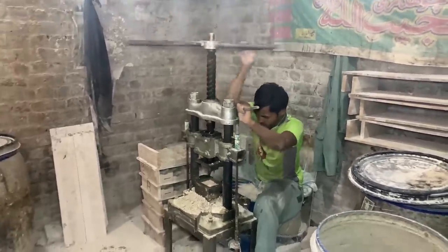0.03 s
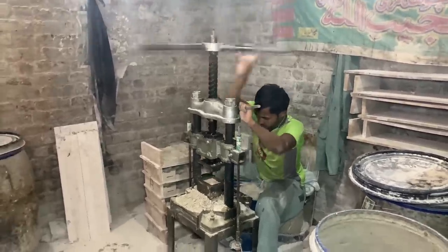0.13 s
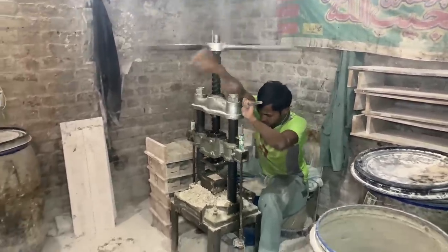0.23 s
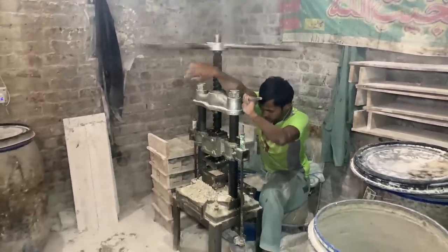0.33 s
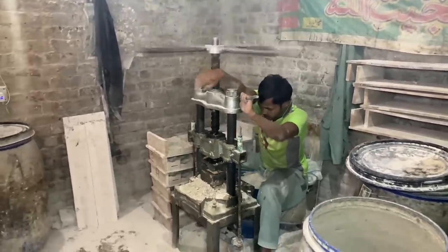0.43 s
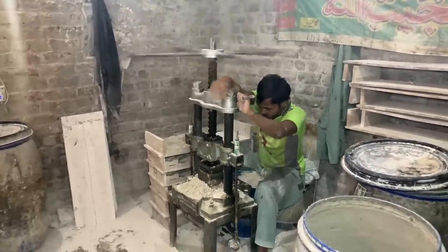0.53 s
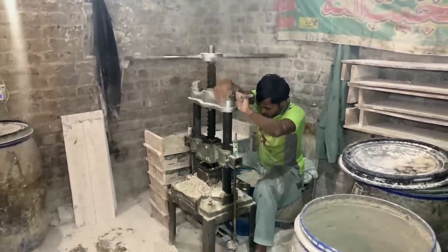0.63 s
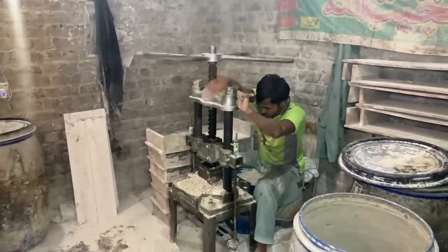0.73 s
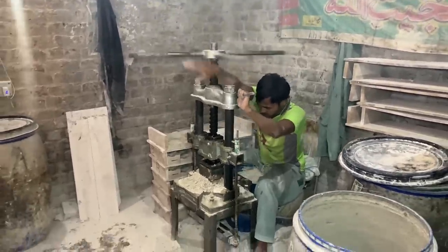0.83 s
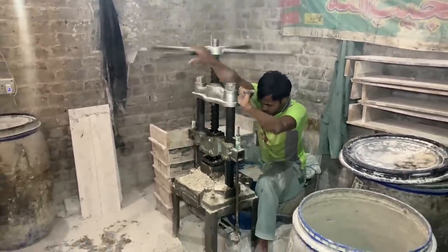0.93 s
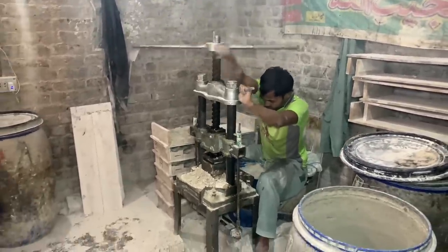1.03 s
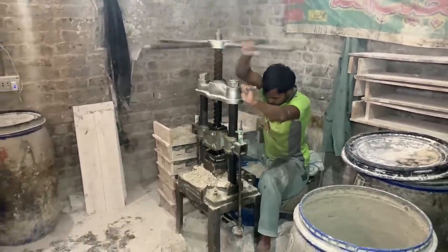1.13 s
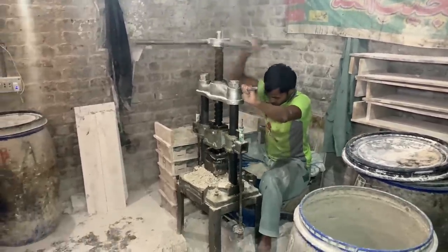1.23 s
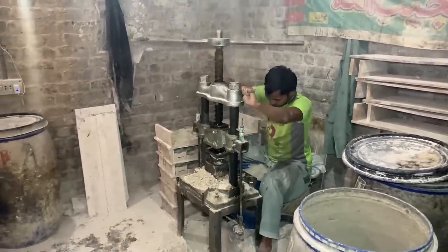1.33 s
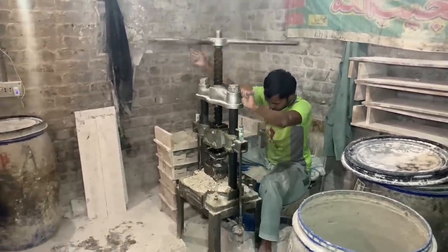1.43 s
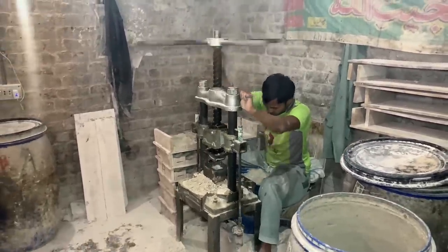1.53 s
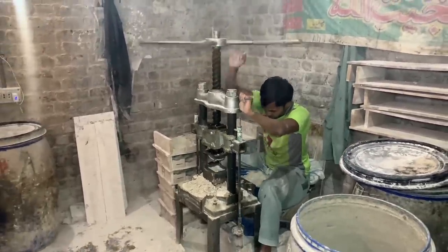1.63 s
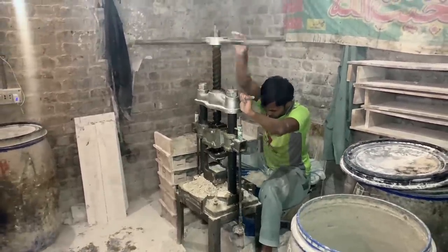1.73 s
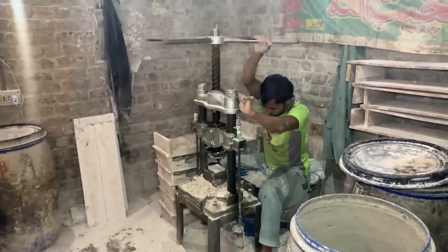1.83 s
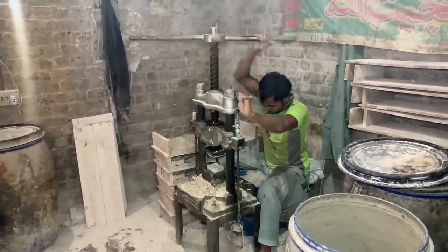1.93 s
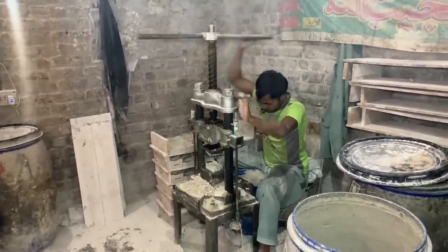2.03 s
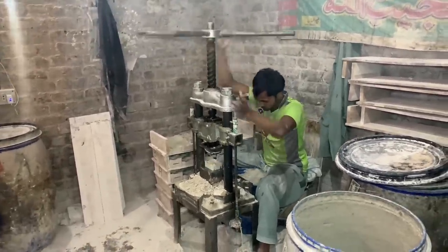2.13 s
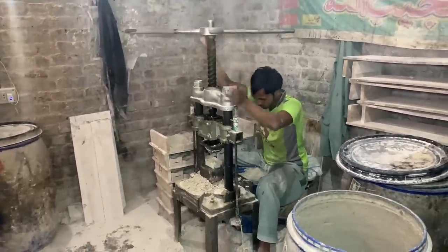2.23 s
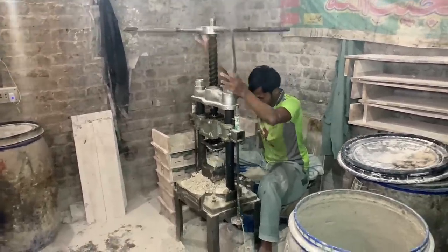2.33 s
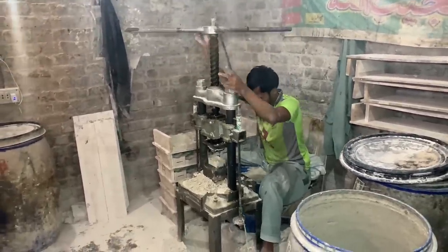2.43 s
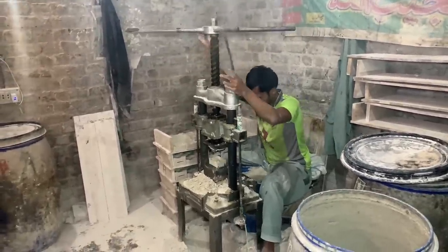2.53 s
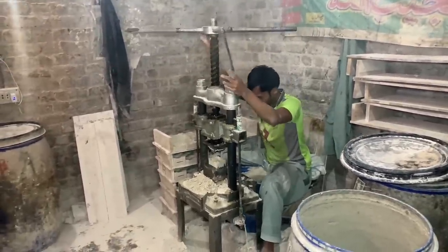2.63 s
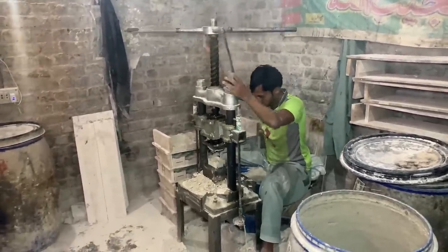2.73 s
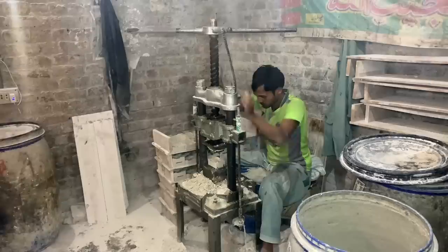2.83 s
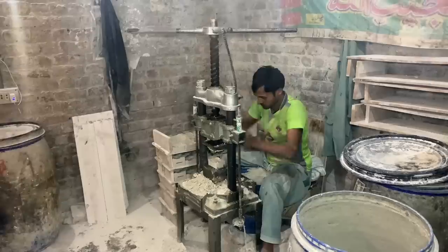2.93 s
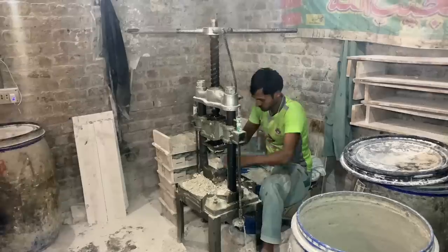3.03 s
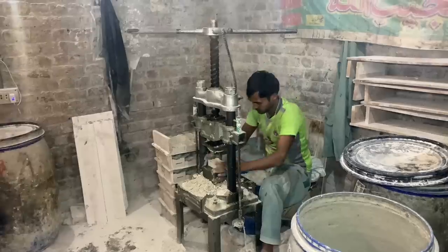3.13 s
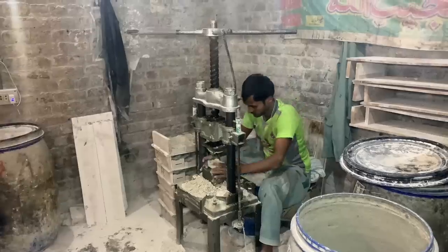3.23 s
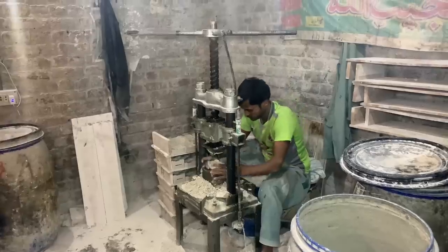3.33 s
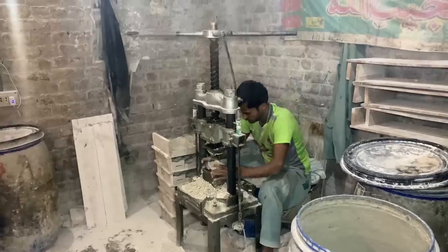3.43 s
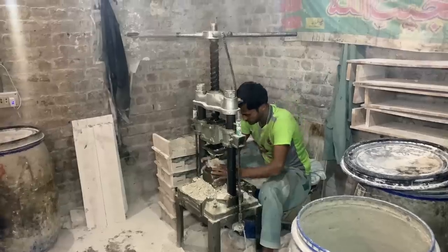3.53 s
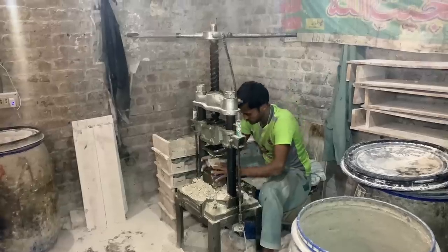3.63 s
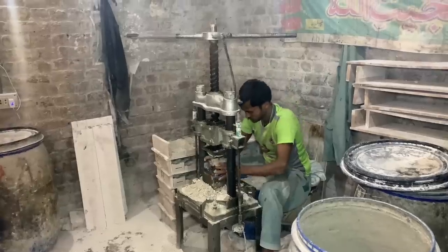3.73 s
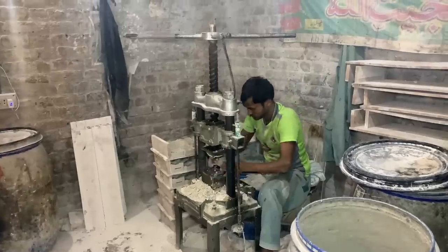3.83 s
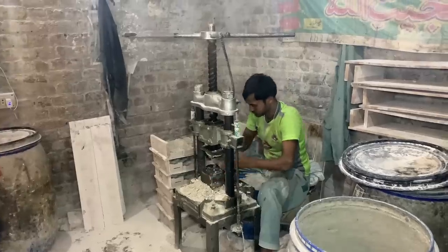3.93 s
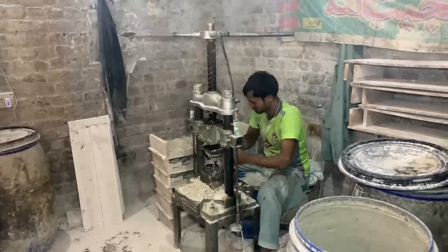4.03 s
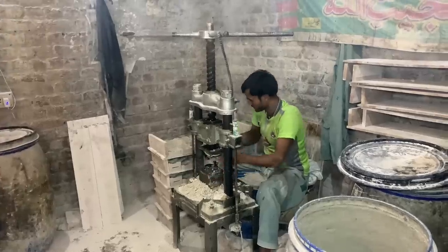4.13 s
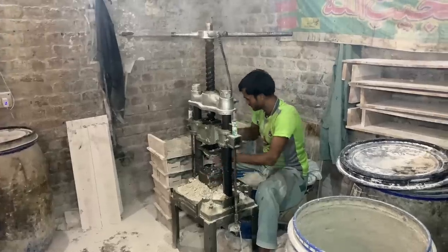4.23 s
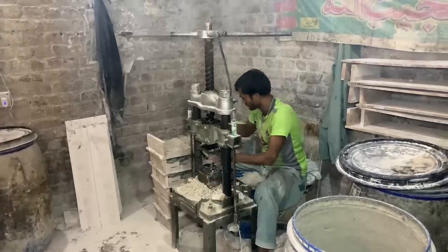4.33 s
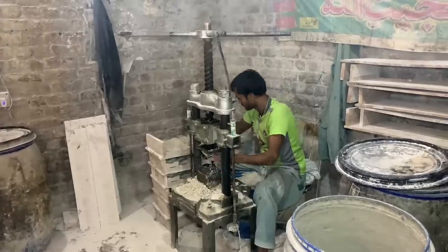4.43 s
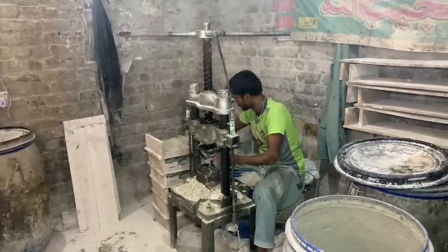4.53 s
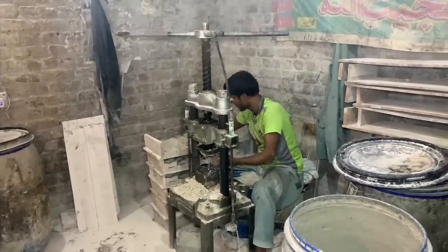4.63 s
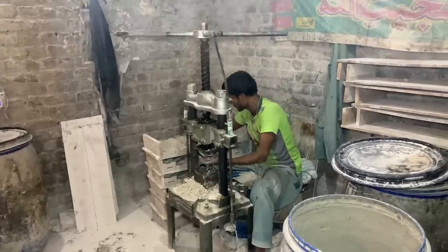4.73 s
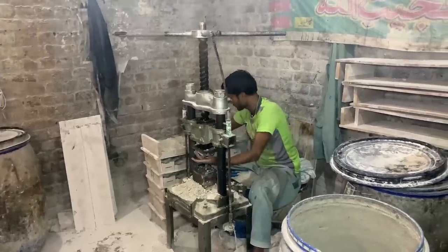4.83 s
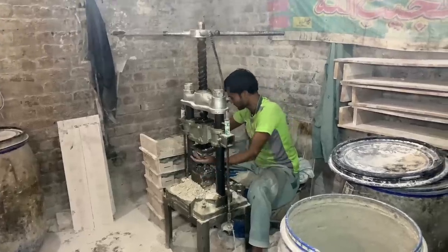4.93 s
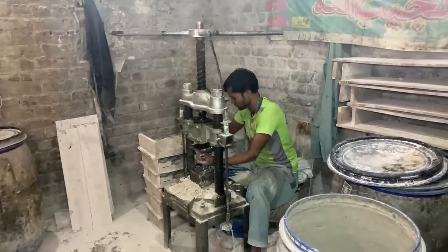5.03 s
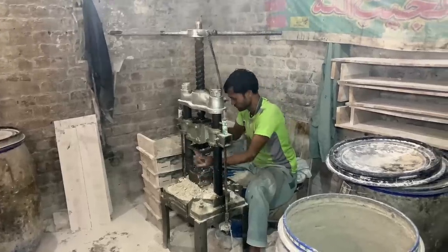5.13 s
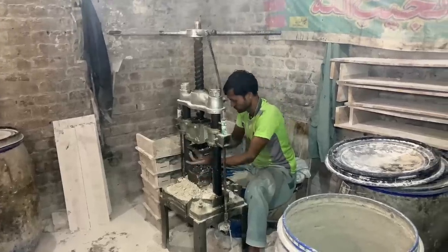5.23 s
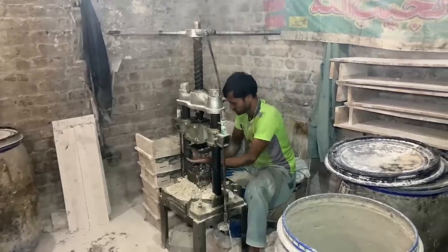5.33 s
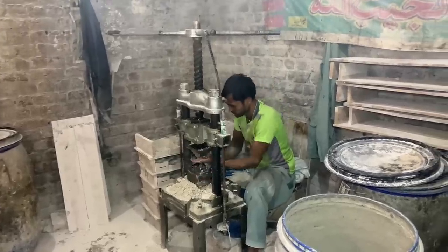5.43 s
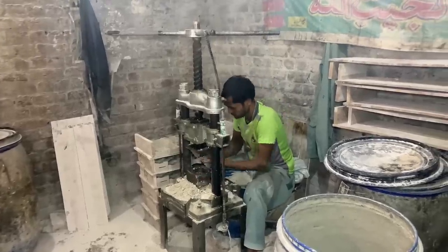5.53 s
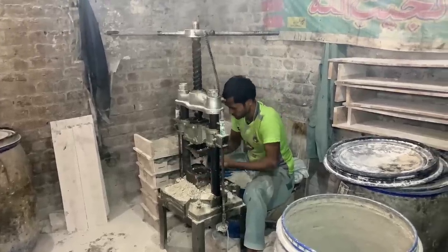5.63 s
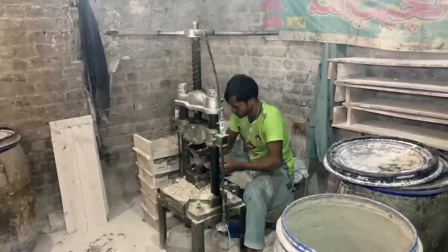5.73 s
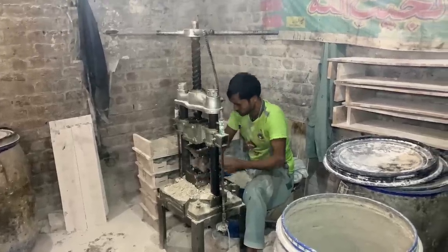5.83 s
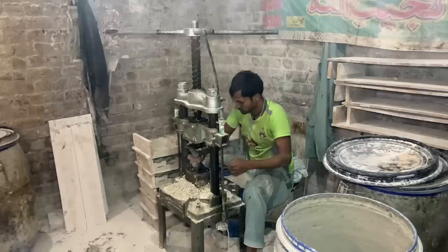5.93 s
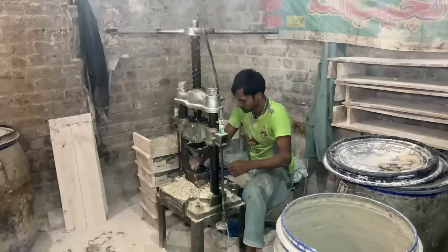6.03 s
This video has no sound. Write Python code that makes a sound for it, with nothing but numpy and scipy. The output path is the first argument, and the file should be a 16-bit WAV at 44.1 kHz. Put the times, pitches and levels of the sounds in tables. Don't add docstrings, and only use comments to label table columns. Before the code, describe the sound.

A hand screw press slams down with a heavy choked metal thud, then steel parts clink and rattle, a second softer blow, and a sharp closing clatter.

```python
import sys
import numpy as np
from scipy import signal
from scipy.fft import rfft, irfft, next_fast_len
from scipy.io import wavfile
from scipy.ndimage import uniform_filter1d, map_coordinates

SR = 44100
rng = np.random.default_rng(int(sys.argv[2]) if len(sys.argv) > 2 else 0)


def volts_from_db(level):
    exponent = np.asarray(level, float) / 20
    return 10 ** exponent


def wav_record(signal):
    frames = np.transpose(np.atleast_2d(signal))
    bounded = np.clip(frames, -1, 1)
    quanta = np.round(bounded * 32767).astype(np.int16)
    wavfile.write(sys.argv[1], SR, quanta)


N = 268877


def unit(x):
    return x / np.sqrt(np.mean(x ** 2) + 1e-20)


def along(points, hz):
    f, v = np.transpose(points)
    return np.interp(np.log(hz + 1), np.log(f + 1), v)


def wobble(rate_hz):
    knots = rng.standard_normal(int(N * rate_hz / SR) + 4)
    return map_coordinates(knots, [np.arange(N) * rate_hz / SR])


def surge(s, hold_s, db, rise_db_s, fall_db_s):
    t = np.arange(N) / SR - s
    return db + np.minimum(0, np.minimum(rise_db_s * t, fall_db_s * (hold_s - t)))


def filtered(x, response):
    m = next_fast_len(x.shape[-1] + SR // 4)
    spectrum = rfft(x, m) * response(np.fft.rfftfreq(m, 1 / SR))
    return irfft(spectrum, m)[..., :x.shape[-1]]


def coloured(x, spectrum):
    return unit(filtered(x, lambda hz: volts_from_db(along(spectrum, hz))))


def resonant(x, peaks):
    def response(f):
        total = 0
        for k, (centre, width, db) in enumerate(peaks):
            damping = 1j * f * width
            total = total + (-1) ** k * volts_from_db(db) * damping / (centre * centre - f * f + damping)
        return total
    return unit(filtered(x, response))


def chatter(length, rate_hz, spread_db):
    hits = rng.random(length) < rate_hz / SR
    size = rng.standard_normal(length) * volts_from_db(spread_db * rng.standard_normal(length))
    return unit(hits * size)


def add(bus, s, sound):
    part = bus[..., round(abs(s) * SR):][..., :sound.shape[-1]]
    part += sound[..., :part.shape[-1]]


def diffuse(pair):
    # frequency in Hz, left-right likeness [0..1]
    likeness = [(60, 1), (300, 0.91), (550, 0.27), (900, 0.15), (1400, 0.043), (2400, 0.038), (4000, 0.2),
                (6500, 0.12), (9500, 0.036), (13000, 0.19)]

    def blend(hz):
        angle = np.arccos(np.clip(along(likeness, hz), -1, 1)) / 2
        return np.array([np.cos(angle), np.sin(angle)])
    mid, side = filtered(pair, blend)
    return np.array([mid + side, mid - side])


def room(x, wet_db):
    # frequency in Hz, t60 in seconds
    brick_t60 = [(60, 0.76), (300, 1), (1500, 0.34), (5000, 0.4), (12000, 0.19)]
    hz, t, z = signal.stft(rng.standard_normal((2, SR * 3 // 4)), SR, nperseg=256)
    tail = signal.istft(z * volts_from_db(-60 * t / along(brick_t60, hz)[:, None]), SR, nperseg=256)[1]
    tail = np.pad(diffuse(tail), ((0, 0), (150, 0)))
    wet = signal.fftconvolve(x[None], tail / np.linalg.norm(tail[0]), axes=1)[:, :len(x)]
    return x + volts_from_db(wet_db) * wet


def murk(spectrum, patchy_db):
    z = signal.stft(rng.standard_normal((2, N)), nperseg=1024)[2]
    field = uniform_filter1d(rng.standard_normal(z.shape[1:]), 8, 0)
    field = unit(uniform_filter1d(field, 6, 1))
    noise = signal.istft(z * volts_from_db(patchy_db * field), nperseg=1024)[1][:, :N]
    return diffuse(coloured(noise, spectrum))


def motor():
    # start in seconds, hold in seconds, level in dB, rise in dB/s, fall in dB/s
    pass_by = (2.55, .27, -35, 150, 90)
    cycles = 114 * np.cumsum(1 + 0.0066 * wobble(10.4)) / SR
    return volts_from_db(surge(*pass_by) + 3.0 * wobble(14)) * np.sin(2 * np.pi * cycles)


def shop():
    # frequency in Hz, density in dB per Hz
    rumble_spectrum = [(13, -83), (31, -43.5), (46, 1.5), (59, 10), (86, 7), (124, 7.5), (200, 4),
                       (260, -27.5), (440, -120)]
    body_spectrum = [(71, -22), (120, -6), (194, -19), (229, 2.5), (258, -7.5), (283, -6), (376, -9),
                     (423, -14), (499, -9.5), (554, -15), (780, -20), (931, -21), (2000, -27.5),
                     (2600, -37.5), (4400, -120)]
    hiss_spectrum = [(710, 3.5), (1200, 1), (1450, -19), (1840, -27), (2000, -14), (2840, -14),
                     (3020, -16.5), (3250, -18.5), (4530, -25.5), (5580, -32.5), (6800, -35), (7500, -46.5),
                     (8100, -39), (9000, -39.5), (11900, -57), (14400, -56)]
    # time in seconds, level in dB
    activity = [(0, 3), (.25, -1), (.5, -1), (1.2, 0), (1.55, 4), (1.9, -2.5), (2.3, 0), (2.7, 2.5),
                (3.1, -1.5), (3.5, 1.5), (3.85, -2), (4.7, -3), (5.1, 0.5), (5.3, -1), (5.55, 2.5),
                (5.8, -2.5), (6.1, 7)]
    # start in seconds, hold in seconds, level in dB
    shudders = [
        (0.756, 0.035, -27),
        (4.135, 0.09, -20.5),
    ]
    s, db = np.transpose(activity)
    bustle_db = np.interp(np.arange(N) / SR, s, db)
    boom = sum(volts_from_db(surge(*row, rise_db_s=180, fall_db_s=72)) for row in shudders)
    swell = wobble(5)
    rumble = volts_from_db(-36.5 + 0.32 * bustle_db) + boom
    rumble = rumble * volts_from_db(1.1 * swell + 0.8 * wobble(8))
    body = volts_from_db(-33.5 + 0.57 * bustle_db) + volts_from_db(-10.5) * boom
    body = body * volts_from_db(1.1 * swell + 0.6 * wobble(12))
    hiss = volts_from_db(-40.5 + 0.78 * bustle_db) + volts_from_db(-11.5) * boom
    hiss = hiss * volts_from_db(0.6 * swell)
    out = rumble * murk(rumble_spectrum, patchy_db=2.0)
    out = out + body * murk(body_spectrum, patchy_db=1.5)
    return out + hiss * murk(hiss_spectrum, patchy_db=1.5)


def small_parts():
    # start in seconds, peak in dB, scrape length in seconds, brightness in dB per octave
    ticks = [(-0.011, -33, 0.009, -6), (0.164, -42, 0.11, -3.5), (0.224, -33.5, 0.047, -11.5),
             (0.643, -55, 0.0097, -1), (0.779, -27, 0.016, 5), (0.832, -27, 0.034, -16),
             (1.151, -54, 0.01, -14), (1.377, -59, 0.045, -19), (1.474, -39.5, 0.088, -17.5),
             (1.51, -42, 0.026, -6), (3.349, -42, 0.031, -6.5), (3.993, -29.5, 0.027, -6),
             (4.081, -21.5, 0.0073, 2), (4.093, -33, 0.038, -8), (4.358, -55.5, 0.04, 6),
             (4.972, -47, 0.12, 0), (5.123, -46.5, 0.12, -2), (5.435, -42.5, 0.037, -3.5),
             (5.479, -27.5, 0.0057, -7)]
    # start in seconds, length in seconds, pitch in Hz, level in dB
    cheeps = [
        (0.946, 0.074, 6080, -69),
        (1.07, 0.073, 6100, -87),
        (4.526, 0.048, 6380, -68),
        (4.69, 0.053, 5600, -67),
        (4.697, 0.03, 6240, -77),
        (5.139, 0.033, 2690, -50),
        (5.143, 0.04, 5430, -81),
        (5.152, 0.044, 4280, -74),
    ]
    out, t = np.zeros(N), np.arange(SR // 4) / SR
    for s, db, length_s, tilt_db in ticks:
        colour = [(600, -27.5), (1500, -2 * tilt_db), (6000, -5.0), (10500, -15.0 + tilt_db), (14500, -32.0)]
        grit = chatter(len(t), 4900, 7.3) + 6 * (t == t[20])
        add(out, s, volts_from_db(db - 10.0 - 26 * t / length_s) * coloured(grit, colour))
    for s, length_s, hz, db in cheeps:
        swell = np.sin(np.pi * np.clip(t / length_s, 0, 1))
        swell *= unit(uniform_filter1d(rng.standard_normal(len(t)), size=300))
        drift = 1 + 0.01 * uniform_filter1d(rng.standard_normal(len(t)), size=200)
        add(out, s, volts_from_db(db) * swell * np.sin(2 * np.pi * hz * np.cumsum(drift) / SR))
    return out


def rod_grip(contacts, modes, clack_db, rise_s):
    # frequency in Hz, density in dB per Hz
    clack_spectrum = [(710, -34), (1300, -3.5), (3050, -2.5), (3920, -7.5), (4980, -7), (8540, -6.5),
                      (10800, -11), (11700, -17), (12400, -15.5), (13300, -33), (14400, -42.5)]
    detune, scatter_db = 0.005, 1.5
    twin_spread, twin_db = 0.035, -10
    out, t = np.zeros((2, N)), np.arange(SR // 4) / SR
    u = t[:SR // 12]
    hz, width_hz, level_db = np.transpose(modes)[:, :, None]
    width_hz = width_hz + 45
    level_db = level_db - 2 * np.log2(hz / 4000)
    for s, db, length_s, rattle_db in contacts:
        sound = np.zeros(len(t) + len(u))
        for face in range(2):
            bend, luck, apart = rng.standard_normal((3, *hz.shape))
            swing = np.sin(2 * np.pi * hz * (1 + detune * bend) * u)
            swing += volts_from_db(twin_db) * np.sin(2 * np.pi * hz * (1 + twin_spread * apart) * u)
            strength = volts_from_db(level_db + scatter_db * luck) * np.sqrt(width_hz)
            ring = np.sum(strength * swing * np.exp(-np.pi * width_hz * u), 0)
            ring *= (1 - np.exp(-u / 0.001)) / np.max(np.abs(ring))
            clack = coloured(rng.standard_normal(len(u)), clack_spectrum)
            clack *= volts_from_db(clack_db - 60 * u / 0.023) * (1 - np.exp(-u / 0.0015))
            turn = np.abs(np.sin(np.pi * (face / 2 + 14 * t)))
            rattle = volts_from_db(rattle_db - 25 - 26 * t / length_s) * turn * chatter(len(t), 900, 2.5)
            add(sound, 0, signal.fftconvolve(rattle, ring + 0.65 * clack))
        add(sound, 0, ring + clack)
        sound[:len(t)] *= 1 - np.exp(-t / rise_s)
        add(out, s, room(volts_from_db(db) * np.pad(sound, (0, SR // 3)), wet_db=2))
    return out


def rod():
    # start in seconds, peak in dB, rattle length in seconds, rattle level in dB
    contacts = [
        [(2.229, -19.5, 0.0099, 0.5)],
        [(2.306, -14, 0.015, 10), (2.3141, -16, 0.014, 10)],
        [(2.3534, -23.5, 0.039, 4.5), (2.4534, -29, 0.036, -11)],
        [(2.521, -22, 0.03, 6.5)],
        [(2.609, -11, 0.059, 0.3), (2.6169, -12.5, 0.046, 0.28), (2.6294, -15, 0.0093, 0.0058),
         (2.7194, -30, 0.025, 0.3)],
        [(2.7997, -22, 0.039, 0.004)],
        [(2.8345, -20, 0.036, 2.5), (2.8554, -26, 0.068, 2.7)],
        [(2.909, -24, 0.17, -2.4)],
        [(5.6067, -37.5, 0.098, 8.8), (5.631, -27.5, 0.12, 5.6), (5.6715, -19.5, 0.037, 4.6),
         (5.6975, -23, 0.072, 3), (5.7594, -30, 0.099, 4.3)],
        [(5.837, -21, 0.03, 3.2), (5.8483, -25.5, 0.061, 4)],
        [(5.9683, -5, 0.048, -13)],
        [(5.985, -10.5, 0.015, 0), (5.9994, -18, 0.041, 2), (6.024, -19, 0.13, 2), (6.058, -34, 0.077, 1.5)],
    ]
    # frequency in Hz, width in Hz, level in dB
    lift_modes = [
        [(2040, 67, -6), (3310, 58, 0), (4270, 100, -11), (6230, 54, -5), (8000, 48, -27), (9600, 54, -20),
         (10500, 81, -22), (11300, 49, -22), (12100, 100, -39), (13100, 160, -21)],
        [(1810, 41, -3), (2470, 37, -8), (3070, 29, -1), (3760, 59, 1), (2660, 36, 1.5), (5600, 47, -19),
         (8300, 220, -46), (9900, 50, -27), (12200, 32, -32), (13000, 34, -23), (14000, 160, -33),
         (14300, 18, -31)],
        [(2410, 53, -9), (3414, 60, 7), (3760, 40, -12), (4500, 80, -7), (5730, 38, -11), (8100, 37, -28),
         (8750, 42, -8), (10400, 110, -9), (12100, 63, -23), (12850, 60, -6), (13900, 40, -7)],
        [(2330, 68, 8), (2750, 30, 16), (3340, 90, 9), (4000, 99, -18), (4850, 35, -7), (7420, 33, -9),
         (8540, 38, -27), (10500, 34, -22), (10900, 81, -24), (12600, 50, -23), (13900, 63, -29)],
    ]
    drop_modes = [
        [(1854, 44, -5), (3660, 17, -1.5), (3880, 74, 3), (6230, 130, -1), (7240, 49, -14), (8700, 56, -9),
         (8700, 35, -11), (10300, 100, -21), (11300, 38, -5), (12000, 35, -24), (12800, 44, -13),
         (14000, 97, -40)],
        [(2800, 120, -2), (3760, 38, -8), (4050, 120, -10), (5760, 28, -12), (6300, 40, -23), (8600, 23, -1.5),
         (10600, 43, -15), (12600, 130, -38), (13700, 62, -41)],
        [(1750, 25, -13), (2760, 130, -17), (4180, 73, -4), (5505, 32, 0), (7340, 56, -10), (8400, 93, -12),
         (8900, 130, -5), (11300, 160, -23), (12600, 39, -15), (13900, 64, -28)],
        [(1910, 48, -16), (2500, 71, -3), (3740, 20, -1), (4340, 28, -19), (5430, 47, -14), (6900, 60, -4),
         (7060, 17, -2), (8870, 46, -19), (10700, 120, -27), (13000, 140, -34)],
    ]
    punch_modes = [
        [(2030, 65, -6), (2650, 30, -6), (3100, 60, -3), (3720, 73, -3), (4200, 40, 1), (5630, 63, -2),
         (7000, 35, -3), (8610, 41, 0), (8900, 46, 1), (9980, 30, -15), (10600, 110, -10), (12400, 60, -16),
         (12600, 60, -17), (14400, 31, -43)],
        [(2800, 70, -4), (3570, 70, -3), (5850, 65, -10), (7170, 31, -8), (8260, 38, -10), (8860, 110, -3),
         (10800, 73, -11), (12600, 250, -18), (13600, 58, -20), (14100, 40, -32), (14400, 31, -31)],
        [(2360, 83, -9), (3030, 93, -13), (3810, 98, -11), (4220, 110, -8), (5450, 70, -12), (5840, 130, -7),
         (7700, 130, -16), (8230, 91, -10), (8870, 89, 4), (10600, 88, -5), (12500, 130, -8), (14000, 290, -39)],
        [(1930, 33, -4), (2680, 30, -13), (3700, 28, -3), (4100, 43, -2), (4940, 38, -12), (5890, 36, 0),
         (8380, 30, 0), (8840, 34, -8), (10600, 120, -12), (12500, 60, -7), (13500, 38, -28), (14000, 27, -2)],
    ]
    clack_db = [-7, -5, -9, -7, -8, -9, -8, -10, -15, -11, -10, -14]
    rise_s = [.003, .004, .002, .005, .004, .003, .003, .003, .003, .003, .0007, .003]
    grips = zip(contacts, lift_modes + drop_modes + punch_modes, clack_db, rise_s)
    return sum(rod_grip(*grip) for grip in grips)


def knocks():
    # start in seconds, peak in dB, pitch in Hz, t60 in seconds
    slam = (0.6973, -2, 203, .031)
    # start in seconds, peak in dB, pitch in Hz, t60 in seconds
    first_blow = [(0.683, -19, 3240, 0.022), (0.685, -19, 1680, 0.1), (0.693, -15, 3045, 0.023),
                  (0.694, -12, 1200, 0.012), (0.715, -14, 190, 0.04), (0.70, -7, 400, 0.03),
                  (0.70, -12, 300, 0.04), (0.71, -25, 3930, 0.03), (0.753, -11, 90, 0.08),
                  (0.782, -13, 200, 0.09), (0.785, -16, 320, 0.11), (0.79, -24.5, 1145, 0.08),
                  (0.79, -29, 1740, 0.067), (0.806, -13, 235, .05), (0.827, -13, 195, 0.06),
                  (.808, -26, 1150, .03), (.785, -33, 4500, .02), (.79, -32, 2600, .03),
                  (.845, -33, 2500, .03), (.85, -38, 4700, .025), (.752, -26, 1850, .06),
                  (.715, -24, 1250, .05), (0.835, -24, 520, 0.05), (0.847, -14, 165, 0.07),
                  (0.915, -17, 140, 0.07), (0.925, -22, 250, 0.06)]
    handle = [
        (1.152, -41, 2070, 0.016),
        (1.17, -44, 2050, 0.013),
        (1.358, -19, 257, 0.03),
        (1.361, -26, 400, 0.06),
        (1.491, -47, 8600, 0.016),
        (1.506, -26, 1142, .04),
        (1.52, -52, 4060, 0.03),
        (1.52, -58, 6560, 0.025),
        (1.532, -29, 1220, 0.033),
        (1.603, -20, 160, 0.03),
    ]
    second_blow = [(4.048, -21, 1020, 0.04), (4.085, -14, 370, 0.026), (4.095, -21, 560, .03),
                   (4.0964, -14, 163, 0.33), (4.0948, -14, 81.6, 0.4), (4.1025, -13, 163, .04),
                   (4.127, -13, 240, 0.04), (4.125, -19, 330, .05), (4.1945, -15, 165, 0.03),
                   (4.219, -14, 95, 0.05), (4.255, -25, 330, .15), (4.081, -31, 3100, .015),
                   (4.083, -34, 4100, .012), (4.057, -30, 2500, .02), (4.112, -24, 1250, .04),
                   (4.155, -30, 2500, .025), (4.16, -28, 1150, .06)]
    die_tap = [
        (5.491, -36, 3870, 0.045),
        (5.491, -35, 3390, 0.029),
        (5.492, -48, 5370, 0.012),
        (5.492, -30, 2100, 0.01),
        (5.493, -23, 1250, 0.016),
        (5.494, -36, 2600, 0.012),
        (5.585, -33, 1250, 0.02),
        (5.583, -32, 700, .03),
    ]
    out, t = np.zeros(N), np.arange(SR // 2) / SR
    choked = [(slam, 3)]
    choked += [(row, 1.6) for row in first_blow + handle + second_blow + die_tap]
    for (s, db, hz, t60_s), choke in choked:
        swing = volts_from_db(-60 * (t / t60_s) ** choke) * (1 - np.exp(-t * hz / 0.45))
        add(out, s, volts_from_db(db) * swing * np.sin(2 * np.pi * hz * t))
    return out


def press():
    # frequency in Hz, width in Hz, level in dB
    bench = [(82.6, 100, 0.5), (115, 27, 5.5), (165.7, 12, 6), (195, 57, 2), (330, 79, -3), (410, 110, -10)]
    # frequency in Hz, level in dB
    feet = [(600, 0), (1500, -6), (4000, -40)]
    # frequency in Hz, width in Hz, level in dB
    castings = [
        [(536, 600, -2), (994, 83, 6), (1194, 355, 0), (1390, 17, -2.5), (1690, 76, -25), (1964, 200, -2.5),
         (2230, 69, -16.5), (2470, 550, -6.5)],
        [(624, 340, 2), (840, 290, 2), (1000, 170, 4.5), (1350, 410, 6.5), (1510, 610, 3.5), (2220, 120, -4.5),
         (2330, 530, -14.5), (3120, 69, -10)],
    ]
    # frequency in Hz, density in dB per Hz
    loose_parts = [
        [(1470, -28), (2500, -1.5), (3850, -5), (5310, -13.5), (5750, -16), (10600, -27), (11400, -32),
         (11800, -99), (12000, -45), (14400, -36.5)],
        [(1470, -24), (2500, -2.5), (3090, -17), (3400, -7), (5920, -40), (7320, -46), (8660, -29),
         (10500, -46), (12000, -56), (14400, -67)],
    ]
    # start in seconds, hold in seconds, casting in dB, loose parts in dB
    jolts_per_blow = [
        [(.696, 0.0016, -7, -16.5), (.72, 0.059, -24.5, -38), (.79, 0.057, -24.5, -39), (.928, 0.041, -39, -72),
         (1.01, 0.0093, -49, -56)],
        [(4.05, 0.046, -24.5, -33), (4.12, 0.068, -28, -39.5), (4.22, 0.034, -28.5, -46),
         (4.36, 0.007, -40.5, -49)],
    ]
    # start in seconds, hold in seconds, level in dB
    rocks_per_blow = [
        [(.79, 0.039, -23.5), (.95, 0.038, -37)],
        [(4.13, 0.005, -30), (4.26, 0.032, -37)],
    ]
    jolt_rise_db_s, casting_fall_db_s, loose_fall_db_s = 1290, 560, 570
    rock_rise_db_s, rock_fall_db_s = 230, 83

    def heavy_frame(hz):
        return 1 / (1 + 1j * hz / 5000) ** 2

    out = np.zeros(N)
    for jolts, rocks, casting, loose in zip(jolts_per_blow, rocks_per_blow, castings, loose_parts):
        rock = sum(volts_from_db(surge(*row, rock_rise_db_s, rock_fall_db_s)) for row in rocks)
        shake = sum(volts_from_db(surge(s, hold_s, db, jolt_rise_db_s, casting_fall_db_s)) for s, hold_s, db, _ in jolts)
        rattle = sum(volts_from_db(surge(s, hold_s, db, jolt_rise_db_s, loose_fall_db_s)) for s, hold_s, _, db in jolts)
        out += rock * resonant(coloured(chatter(N, 300, 1.0), feet), bench)
        out += volts_from_db(-5) * shake * resonant(filtered(chatter(N, 3500, 1.5), heavy_frame), casting)
        out += volts_from_db(-5) * rattle * coloured(chatter(N, 4000, 2.5), loose)
    return out


def scene():
    background = motor() + shop()
    handling = room(small_parts(), wet_db=5.0) + rod()
    heavy = room(knocks(), wet_db=-12) + room(press(), wet_db=-4)
    return background + handling + heavy


def band_limit(x):
    return signal.sosfilt(signal.butter(12, 14700, fs=SR, output="sos"), x)


def record(dry):
    # frequency in Hz, left minus right in dB
    port_db = [(60, 0), (98, -2.5), (160, 0), (260, -2), (430, -0.5), (710, 1.0), (1170, 0), (1920, -1),
               (3150, -1), (5160, -1), (8470, -7.5), (13900, 3)]
    # frequency in Hz, left lead in radians
    port_turn = [(0, 0), (520, 0.4), (1460, -2.1), (2840, 2.2), (4130, -0.7), (6030, 6.2), (6370, 6.5),
                 (7750, 11.4), (10100, 6.3), (10800, 5.8), (11300, 3.3), (12300, 2.8), (13000, 0.1),
                 (14000, -0.3)]
    # frequency in Hz, response shared by both ports in dB
    shared_db = [(22, -8), (42, -1), (6000, 2.5), (7600, -0.5), (8400, 5.5), (9200, 1), (11100, 5),
                 (11400, -1.5), (12000, 0.5), (12400, 8), (13200, 10.5), (14300, -10), (14750, -18)]
    half = np.array([[0.5], [-0.5]])

    def ports(hz):
        gain = volts_from_db(half * along(port_db, hz)) * volts_from_db(along(shared_db, hz))
        return gain * np.exp(1j * half * along(port_turn, hz))
    heard = filtered(dry, ports)
    held = heard / (1 + np.abs(heard / 0.95) ** 6) ** (1 / 6)
    mix = filtered(held, lambda hz: hz < 14750)
    return band_limit(mix)


dry = scene()
out = record(dry)
wav_record(out)
```